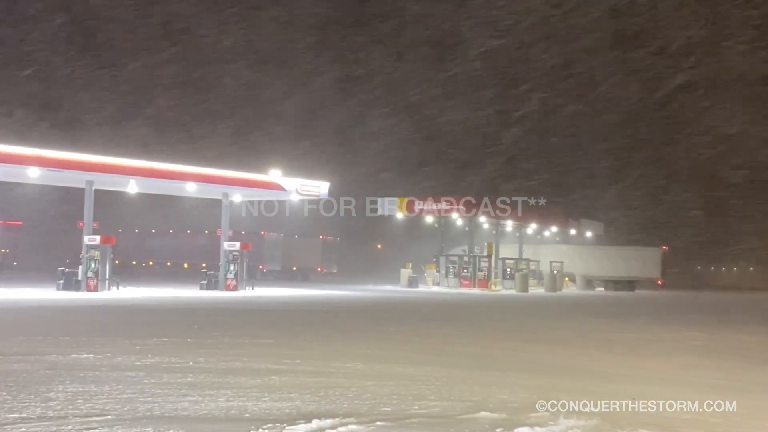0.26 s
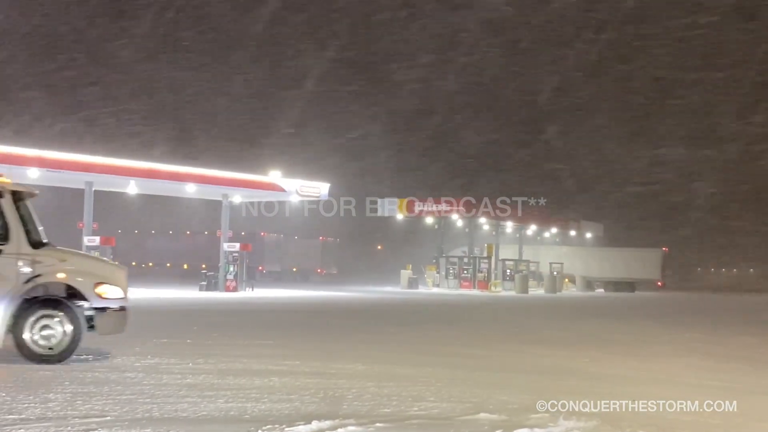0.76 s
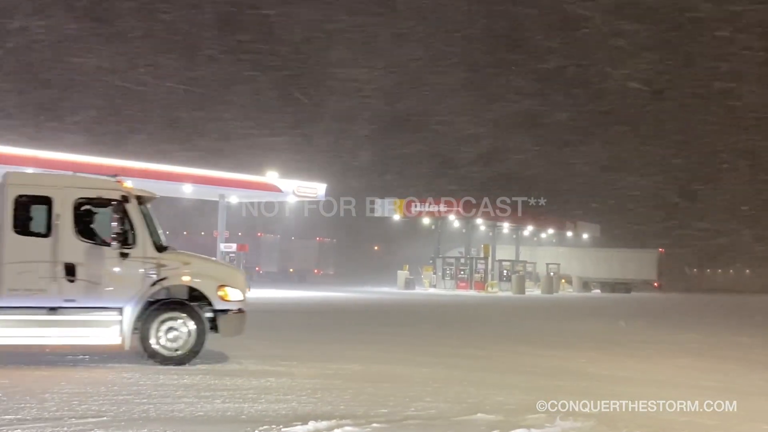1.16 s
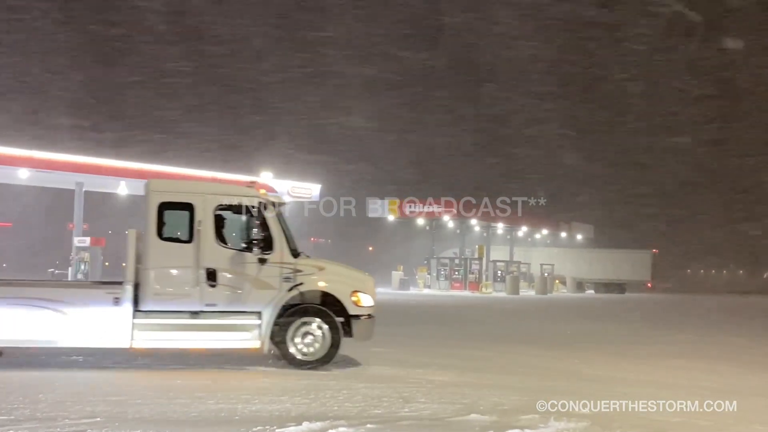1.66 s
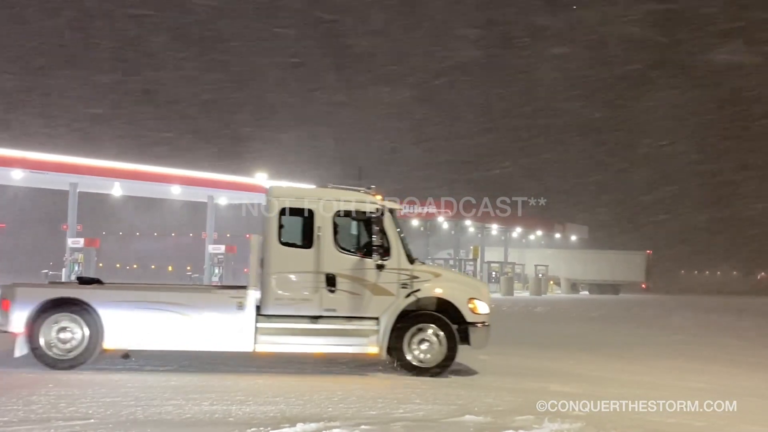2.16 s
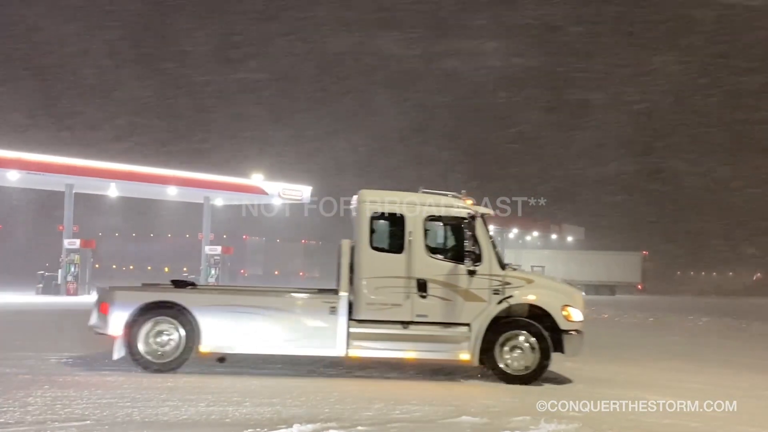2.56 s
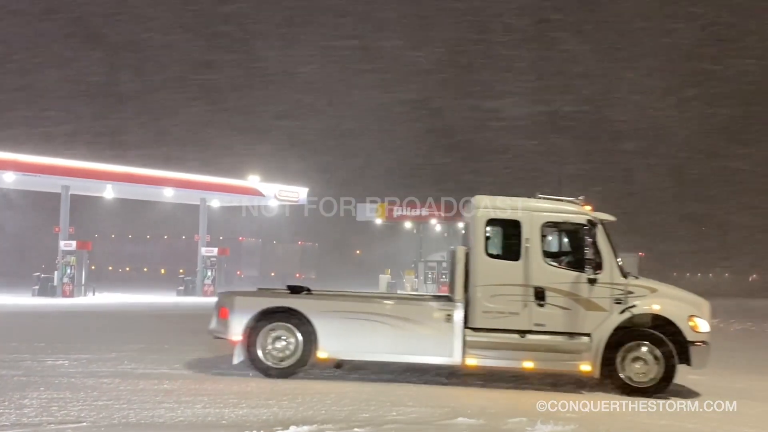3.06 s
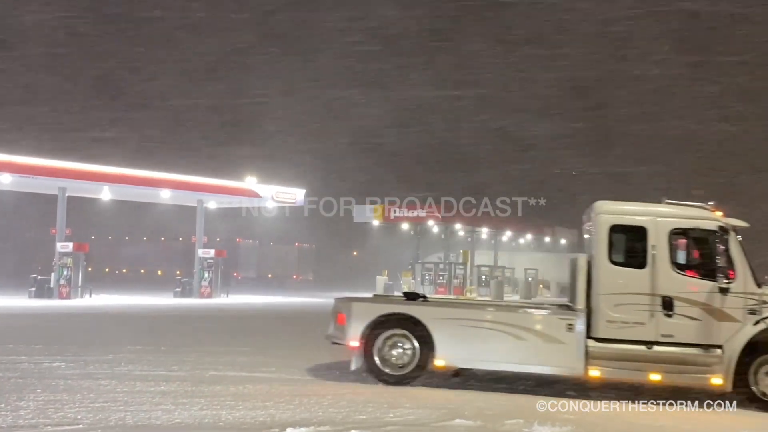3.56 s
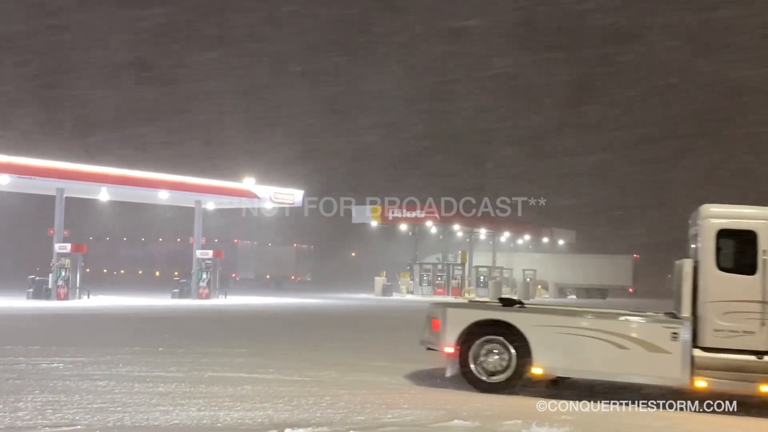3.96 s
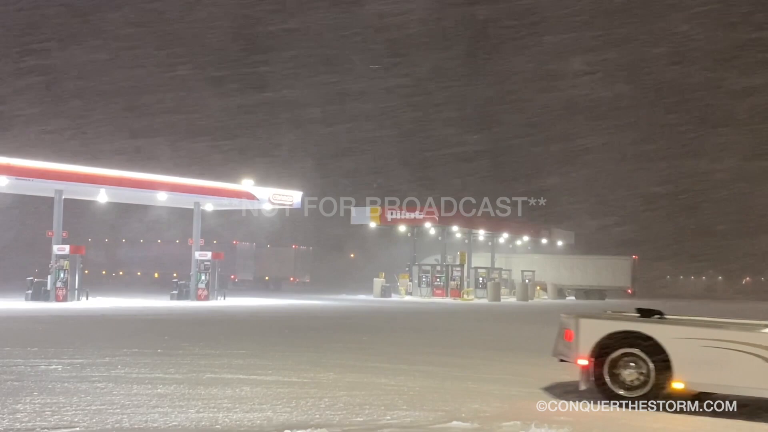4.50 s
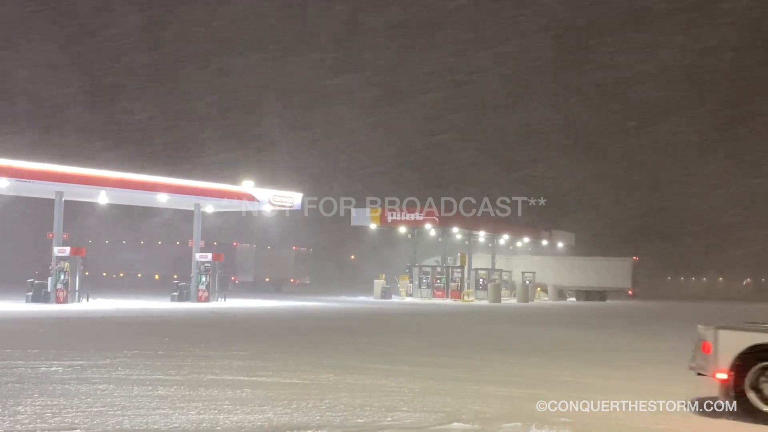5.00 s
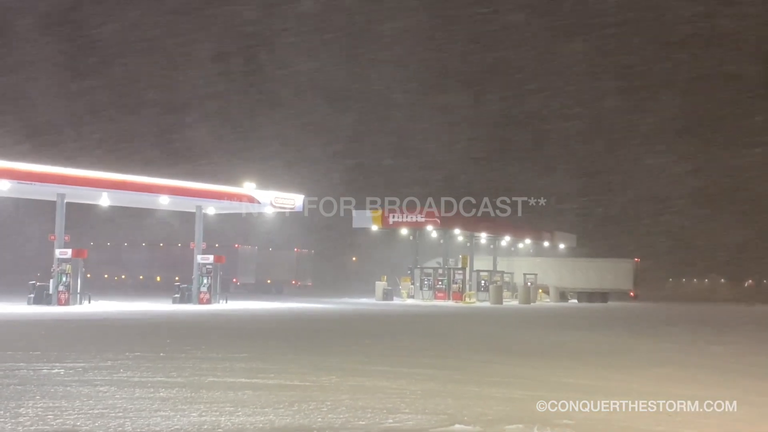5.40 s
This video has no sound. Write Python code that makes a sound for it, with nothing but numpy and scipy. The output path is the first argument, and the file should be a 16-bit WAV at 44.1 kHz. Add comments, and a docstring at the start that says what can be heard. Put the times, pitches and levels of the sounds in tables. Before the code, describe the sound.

A diesel truck eases off and coasts by in a blizzard, its engine rattling and whining under heavy wind buffeting and snow hiss.

```python
"""Gusts rumble, flutter and thump on the microphone while a diesel truck rolls slowly past in a blizzard.
The driver eases off after a second: the engine slows, its rattle softens and the turbo whistle sinks.
A whine accompanies the coasting; tyres, rasps and blowing snow hiss. The midrange leans left, then centres.
Wind is shaped noise with pulses for single eddies; the engine is harmonics and noise gated by its firings.
Turbo and whine are narrow noise bands that follow a pitch; the hisses are coloured, grainy noise."""
import sys
import numpy as np
from scipy import signal
from scipy.fft import rfft, irfft
from scipy.io import wavfile
from scipy.ndimage import uniform_filter1d

SR = 44100
rng = np.random.default_rng(int(sys.argv[2]) if len(sys.argv) > 2 else 0)


def wav_record(signal):
    """Record a signal, one row per channel, as 16-bit PCM in the file named by sys.argv[1]."""
    frames = np.transpose(np.atleast_2d(signal))
    bounded = np.clip(frames, -1, 1)
    # unit amplitude maps onto the largest positive 16-bit level
    quanta = np.round(bounded * 32767).astype(np.int16)
    wavfile.write(sys.argv[1], SR, quanta)


N = 248724
TIME = np.arange(N) / SR
BINS = np.fft.rfftfreq(N, 1 / SR)

# engine speed and turbo whistle: t/s, firing rate/Hz, whistle f/Hz, whistle relative level/dB
ENGINE_CURVE = [(0, 97, 7400, -62), (.6, 111, 7400, -56), (.8, 105, 7260, -62), (1.1, 94, 7130, -56.5),
                (1.45, 79, 6960, -59), (1.9, 73, 6720, -62), (2.3, 76.4, 6420, -69), (3, 78, 5950, -59),
                (3.6, 82, 5850, -51.5), (4.35, 73, 5740, -66), (4.95, 68, 5560, -56), (5.2, 78, 5570, -76),
                (5.64, 82, 5370, -72)]
# when the cab and the tailpipe are nearest (s), and how near (m)
CAB_S, CAB_M = 3.2, 2.93
PIPE_S, PIPE_M = 4.23, 1.5
HIDDEN_DB = -6  # what whine and clatter lose while the truck is broadside on


def amp(db):
    """Decibels to gain."""
    return 10 ** (np.asarray(db) / 20)


def unit(x):
    """Scales to rms 1."""
    return x / np.sqrt(np.mean(np.abs(x) ** 2) + 1e-20)


def follow(rows):
    """The columns of a curve table, sample by sample."""
    s, *columns = np.transpose(rows)
    return [np.interp(TIME, s, c) for c in columns]


def read(points):
    """A table over frequency, joined on a log axis."""
    hz, value = np.transpose(points)
    return np.interp(np.log(BINS + 1), np.log(hz + 1), value)


def bump(centre_s, spread_s):
    """A bell-shaped swell that reaches 1 at its centre."""
    return np.exp(-.5 * ((TIME - centre_s) / spread_s) ** 2)


def rings(modes):
    """Gain over frequency of a set of resonances, summed as power."""
    power = 0
    for hz, width, db in modes:
        power = power + amp(2 * db) / (1 + ((BINS - hz) / width) ** 2 * 2) ** 2
    return np.sqrt(power)


def waver(hz):
    """Slow chance of rms 1, up to about the given rate."""
    lowpass = 1 / (1 + (BINS / hz) ** 4)
    return unit(irfft(rfft(rng.standard_normal(N)) * lowpass, N))


def noise(colour, gate=1, likeness=None):
    """Gated noise of rms 1, coloured and picked up by two ports that hear partly different air."""
    # likeness of the two ports for most sounds: f/Hz, likeness/(0-1)
    usual_likeness = [(60, .95), (200, .88), (700, .88), (1150, .94), (1600, .995), (6000, .995),
                      (8000, .96), (15000, .94)]
    # phase by which the left port leads: f/Hz, phase/rad
    left_lead = [(7400, 0), (9100, -3.1), (11200, -6.3), (13300, -9.4), (15400, -12.6)]
    left, other = rfft(rng.standard_normal((2, N)) * gate)
    same = np.clip(read(usual_likeness if likeness is None else likeness), 0, 1)
    right = same * left + np.sqrt(1 - same ** 2) * other
    right = right * np.exp(-1j * read(left_lead))
    return unit(irfft(np.array([left, right]) * colour, N))


def steadied(x, seconds):
    """Noise with its own slow swells evened out."""
    power = uniform_filter1d((x ** 2).mean(0), int(seconds * SR))
    return x / np.sqrt(power + 1e-9)


def band(x, low_hz, high_hz, order):
    """Causal band-pass: the bass arrives last, so a pulse sinks in pitch."""
    x = signal.sosfilt(signal.butter(order, min(high_hz, SR / 3), fs=SR, output="sos"), x)
    return signal.sosfilt(signal.butter(4, low_hz, "high", fs=SR, output="sos"), x)


def add(mix, s, sound):
    """Mixes a stereo sound in at time s."""
    part = mix[:, max(round(s * SR), 0):][:, :sound.shape[1]]
    part += sound[:, :part.shape[1]]


def whistle(pitch_hz, half_width_hz):
    """A narrow band of noise that follows a pitch curve."""
    turn = 2 * np.pi * np.cumsum(pitch_hz * np.ones(N)) / SR
    return unit(waver(half_width_hz) * np.cos(turn) + waver(half_width_hz) * np.sin(turn))


def load(lift_s=0.914, lift_fall_s=0.027, press_s=5.0, press_rise_s=0.073, press_load=0.4):
    """How hard the engine pulls, 0-1: full at first, then coasting, then a light press of the pedal."""
    lift = np.exp(-np.maximum(TIME - lift_s, 0) / lift_fall_s)
    return lift + press_load * np.clip((TIME - press_s) / press_rise_s, 0, 1)


def passing(nearest_s, nearest_m, speed_m_per_s=4):
    """Gain of a source that rolls by: one over its distance, 1 at the nearest point."""
    return nearest_m / np.hypot(nearest_m, speed_m_per_s * (TIME - nearest_s))


def broadside():
    """1 while the side of the cab faces the microphone, 0 well before and after."""
    return bump(3.2, 0.33)


def drifting(x, depth=0.006):
    """The pitch of every ring wavers a little, by warping time."""
    warped = np.cumsum(1 + depth * waver(hz=5.03)) / SR
    warped = warped * TIME[-1] / warped[-1]
    return np.array([np.interp(warped, TIME, channel) for channel in x])


def wind(lumpy_db=4.5, heave_db=3, rumble_db=-2, flutter_under_db=-12.5):
    """Gusts ride on the breeze: large slow eddies rumble, small ones come in quick lumps and flutter."""
    # wind between gusts: t/s, relative level/dB
    breeze = [(0, -33), (.2, -31), (.3, -29), (.55, -28.5), (1.0, -33), (1.6, -32.5), (2.2, -31.5),
              (2.4, -25), (2.6, -28), (2.9, -28.5), (3.6, -28), (3.82, -34), (3.97, -27.5), (4.13, -30),
              (4.33, -28), (4.6, -27), (4.9, -37), (5.2, -26), (5.45, -33.5), (5.64, -38.5)]
    # gusts that swell and fall: crest t/s, relative rumble level/dB, flutter level/dB, spread/s
    gusts = [(0.076, -19, -29, 0.044), (0.41, -20, -30.5, 0.03), (0.833, -21, -24, 0.029),
             (1.1, -27, -37, 0.013), (1.242, -22.5, -32, 0.019), (1.478, -29, -30, 0.017),
             (1.734, -24.5, -30, 0.033), (1.87, -28, -31.5, 0.061), (2.089, -22, -27, 0.03),
             (2.39, -29, -34, 0.03), (2.53, -32, -32.5, 0.043), (2.714, -41, -32, 0.033),
             (3.294, -22, -29, 0.033), (3.45, -25, -30, 0.035), (3.628, -25.5, -27.5, 0.0063),
             (4.219, -29, -34.5, 0.033), (4.443, -23, -23, 0.014), (4.725, -24, -30, 0.087),
             (4.954, -25.5, -27.5, 0.045), (5.093, -18, -18, 0.02), (5.279, -21, -25, 0.021),
             (5.351, -23, -32, 0.021)]
    # spectrum of the large eddies: f/Hz, relative level/dB
    rumble_colour = [(20, -49), (32, -20), (50, 3), (80, 0.5), (130, -2.5), (200, -13), (400, -26.5),
                     (900, -61)]
    # spectrum of the small eddies: f/Hz, relative level/dB
    flutter_colour = [(40, -27), (110, -12), (200, 0.5), (350, -3), (600, -13), (1000, -27.5),
                      (2000, -34.5), (4000, -52.5)]
    breeze_db = follow(breeze)[0]
    low_power = amp(2 * breeze_db)
    mid_power = amp(2 * (breeze_db + flutter_under_db))
    for s, low_db, mid_db, spread in gusts:
        swell = bump(s, spread)
        low_power = low_power + amp(2 * low_db) * swell
        mid_power = mid_power + amp(2 * mid_db) * swell
    rumble = steadied(noise(amp(read(rumble_colour)), amp(heave_db * waver(hz=24.9))), 0.081)
    flutter = steadied(noise(amp(read(flutter_colour)), amp(lumpy_db * waver(hz=53.5))), 0.164)
    return amp(rumble_db) * np.sqrt(low_power) * rumble + np.sqrt(mid_power) * flutter


def truck(ring_share=0.8, overtone_db=-18, jitter=0.0077, unsteady_db=4.0, sway_cycles=0.11):
    """Each firing puffs down the exhaust and knocks the block and the panels round it."""
    # unequal knocks of the six cylinders, in firing order: level/dB
    cylinders_db = [2, -9, -4, 1.5, -9, -4]
    # broad spectrum of the roar: f/Hz, relative level/dB
    roar_colour = [(260, -33), (450, -36), (541, 4), (631, -7), (804, 1.5), (884, -4.5), (1370, 2),
                   (1500, -6), (1640, -0.5), (2100, -10.5), (2280, -3.5), (2600, -17), (3380, -46),
                   (5720, -120)]
    # resonances in the roar: f/Hz, width/Hz, relative level/dB
    roar_rings = [(735, 25, -7), (820, 46, -1.5), (1030, 205, 3), (1337, 15.6, 8.5), (1420, 31, -3)]
    # spectrum of the rattle: f/Hz, relative level/dB
    rattle_colour = [(700, -11), (1200, 1.5), (1700, -9.5), (2150, 9.5), (2500, 6), (2830, 8), (3200, -5.5),
                     (3600, -6), (4000, -2), (4600, -1.5), (6500, -15), (9000, -19)]
    # resonances of the engine block: f/Hz, width/Hz, relative level/dB
    block_rings = [(1336, 37, -1), (1800, 83, -0.5), (1982, 55, 7), (2215, 71, 4), (2700, 50, -3),
                   (3350, 97, -0.5), (3628, 42, 3.5), (3990, 79, -11), (4450, 100, -12), (4740, 59, -7),
                   (5450, 120, -9.5), (7500, 690, -14.5)]
    firing_hz, pull = follow(ENGINE_CURVE)[0], load()
    firings = np.cumsum(firing_hz * (1 + jitter * waver(hz=9.1))) / SR
    # unequal knocks make the noise throb once a crank turn
    strength = amp(cylinders_db)[firings.astype(int) % len(cylinders_db)]
    knocks = 0.5 + strength * np.exp(-(firings % 1) / 0.4)  # fades over 0.4 of a firing, above a floor

    swayed = firings + sway_cycles * waver(hz=23.0)  # gusts push the exhaust puffs about
    exhaust = unit(sum(amp(overtone_db * k) * np.sin(2 * np.pi * (k + 1) * swayed) for k in range(4)))
    roar_spectrum = unit(amp(read(roar_colour))) + ring_share * unit(rings(roar_rings))
    roar = noise(roar_spectrum, knocks + 1.7)  # fan and tyres add the steady share
    rattle = noise(amp(read(rattle_colour)), knocks)
    clatter = drifting(noise(rings(block_rings), knocks))

    # the bonnet screens the roar until the side of the cab comes round
    screened = .5 * (1 - np.tanh((TIME - 2.02) / (2 * 0.034)))
    # each level: pedal up, plus what full load adds
    exhaust_db = -28.5 - 1 * pull + unsteady_db * waver(hz=20)
    roar_db = -35 + 9 * pull - 12.5 * screened
    rattle_db = -57 + 16 * pull
    clatter_db = -46 - 7.5 * pull + HIDDEN_DB * broadside()
    return (exhaust * passing(PIPE_S, PIPE_M) * amp(exhaust_db)
            + roar * passing(CAB_S, CAB_M) * amp(roar_db)
            + rattle * amp(rattle_db)
            + clatter * amp(clatter_db))


def turbo(waver_db=3.0, half_width_hz=90, near_half_width_hz=260):
    """A breathy, broken whistle that sinks as the turbine runs down and spreads into a hiss close by."""
    _, whistle_hz, db = follow(ENGINE_CURVE)
    near = passing(CAB_S, CAB_M) ** 2
    narrow = np.sqrt(1 - near) * whistle(whistle_hz, half_width_hz)
    wide = np.sqrt(near) * whistle(whistle_hz, near_half_width_hz)
    return amp(db + waver_db * waver(hz=22)) * (narrow + wide)


def tyres(level_db=-50.5, grain_db=2):
    """Tyres press dry snow: a broad, grainy hiss, strongest while the truck is close."""
    # spectrum of the pressed snow: f/Hz, relative level/dB
    tyre_colour = [(1800, -2), (2600, -20), (3100, -25), (3500, 9), (4400, 9), (4700, 15), (5000, -10),
                   (5300, -6), (6500, 1), (8000, -5.5)]
    hiss = noise(amp(read(tyre_colour)), amp(grain_db * waver(hz=300)))
    return amp(level_db) * passing(CAB_S, CAB_M) ** 2 * hiss


def snow(level_db=8.0, swirl_db=1.13, grain_db=2.0):
    """Countless ice grains skim the ground in drifting sheets: noise with fast grain and slow swirl."""
    # level of the snow hiss: t/s, relative level/dB
    hiss_level = [(0, -46), (.35, -46.5), (1.2, -50), (1.65, -50), (2.1, -51.5), (2.6, -50), (3.6, -50),
                  (4.25, -52), (5.0, -52), (5.3, -56.5), (5.64, -48.5)]
    # spectrum of the grains: f/Hz, relative level/dB
    snow_colour = [(150, -43), (390, -8), (560, 13), (900, 14.5), (1150, 5), (1450, 11), (2100, 7),
                   (3100, 6), (4500, 5.5), (6200, -0.5), (7500, -7.5), (11200, -6.5), (15500, -12)]
    # snow comes from all round, so its midrange differs more between ports: f/Hz, likeness/(0-1)
    snow_likeness = [(400, .8), (900, .55), (1400, .15), (1750, .8), (2100, .995), (6000, .995),
                     (8000, .93), (15000, .9)]
    grains = amp(grain_db * waver(hz=1520) + swirl_db * waver(hz=23.2))
    return amp(follow(hiss_level)[0] + level_db) * noise(amp(read(snow_colour)), grains, snow_likeness)


def buffets(low_share=0.17, lowest_hz=55, boom_hz=150, boom_db=-2, apart_least=0.21, apart_hz=1700,
            level_db=-4.0):
    """A gust tears off the casing in a burst of turbulence that swells fast and dies away over a low boom."""
    # hardest bursts: crest t/s, relative crest level/dB, upper corner f/Hz, swell time/s
    bursts = [(0.027, -17.5, 534, .013), (0.067, -13, 690, 0.0084), (0.38, -18.5, 656, 0.011),
              (.43, -18, 640, 0.0072), (0.785, -11, 586, .012), (.815, -20.5, 680, 0.009),
              (0.854, -17, 527, 0.0077), (1.237, -17.5, 560, 0.0044), (1.389, -24, 295, 0.0089),
              (1.71, -24, 562, 0.015), (1.779, -27, 555, .016), (1.87, -24, 479.3, 0.015),
              (2.145, -19, 540, 0.009), (2.346, -19, 890, 0.0058), (2.39, -24, 670, 0.0083),
              (2.665, -25, 496, 0.0096), (2.749, -26, 510, .01), (3.185, -18.5, 544, 0.0072),
              (3.26, -16, 560, 0.0058), (3.294, -16.5, 420, 0.0033), (4.41, -22, 560, 0.0062),
              (4.444, -18, 540, 0.0037), (4.631, -16, 900, 0.003), (4.679, -16.5, 537, 0.00766),
              (4.711, -24, 770, 0.0049), (4.767, -16.5, 736, 0.0069), (4.845, -23, 616, 0.009),
              (4.966, -29, 700, 0.013), (5.058, -22, 910, 0.0084), (5.085, -23, 900, 0.0085),
              (5.107, -15.5, 700, 0.0053), (5.26, -16.5, 890, 0.01), (5.277, -10, 680, 0.0041),
              (5.286, -13, 890, 0.0066), (5.301, -15.5, 706, 0.0048)]
    out, t = np.zeros((2, N)), np.arange(SR // 8) / SR
    for s, db, hz, swell in bursts:
        shared, side = rng.standard_normal((2, len(t)))
        shape = (t / swell) ** 2 * np.exp(2 - 2 * t / swell)
        apart = apart_least + (hz / apart_hz) ** 2  # small eddies reach each port separately
        swirl = (shared + apart * np.array([side, -side])) * shape
        burst = unit(band(swirl, max(low_share * hz, lowest_hz), hz, order=4))
        boom = unit(band(swirl, lowest_hz, boom_hz, order=4))
        gain = amp(db + level_db) * np.sqrt(np.mean(shape ** 2))
        add(out, s - swell, gain * (burst + amp(boom_db) * boom))
    return out


def thumps(reach=1.016, low_share=0.42, level_db=-1.0, wake_share=0.36, wake_sink=0.69, wake_cycles=1.31):
    """One eddy crosses the port: a push and a suck of pressure, then a slower, weaker one in its wake."""
    # single eddies: t/s, relative peak level/dB, centre f/Hz, left-right level/dB
    eddies = [(0.046, -14, 333, -1), (0.067, -12.5, 456, 2), (0.099, -14, 566, 1), (.13, -22, 376, 6),
              (.274, -27.5, 446, 3), (.419, -15, 525, 4), (0.775, -15.5, 420, 2), (.7845, -15.5, 607, 7),
              (.841, -12.5, 584, 6), (.857, -15, 385, -2), (1.23, -16, 435, 5), (1.236, -17.5, 567, 3),
              (1.925, -16, 290, 3), (2.085, -21, 252, -1), (2.137, -12.5, 400, 3.5), (2.339, -15, 607, -1),
              (2.383, -17, 506, 1), (2.758, -24, 400, 2), (3.286, -9, 400.5, 3.5), (3.313, -13, 560, 3),
              (4.177, -9.5, 353, 3.5), (4.427, -4.5, 334, 4.5), (4.627, -5.5, 421, 1),
              (4.672, -14.5, 705, 4), (4.712, -19, 551, 2), (4.768, -14, 563, -2), (4.8, -19, 450, 7),
              (4.897, -25, 522, 14), (4.973, -18, 570, -1), (5.011, -22, 480, -2), (5.048, -12.5, 553, 5),
              (5.061, -12, 564, 4), (5.085, -16, 520, 5), (5.1, -8.5, 910, 6.5), (5.18, -19, 600, 3),
              (5.221, -22, 450, 5), (5.2705, -5.5, 1260, 2.5), (5.2725, -7.5, 670, 3)]
    out, t = np.zeros((2, N)), np.arange(SR // 12) / SR
    for s, db, hz, pan_db in eddies:
        gains = amp([[db + level_db + pan_db / 2], [db + level_db - pan_db / 2]])
        strike = (0, 1, hz)
        wake = (wake_cycles / hz, wake_share, wake_sink * hz)
        for delay, share, pitch in (strike, wake):
            u = 2 * np.pi * pitch * t
            pulse = band((1 - u) * np.exp(-u), low_share * pitch, reach * pitch, order=3)
            add(out, s + delay, share * gains * pulse / abs(pulse).max())
    return out


def booms(sink=0.54, skew=0.55, apart_rad=0.19):
    """A large vortex rocks the air in the ports: a few deep swings that swell and sink in pitch."""
    # deep booms around the harder thumps: t/s, peak level/dB, starting f/Hz, length/s
    vortices = [(0.766, -8, 148.3, 0.057), (1.232, -33, 178, 0.039), (2.132, -20, 172, 0.04),
                (3.28, -12, 235, 0.017), (4.173, -14, 135, 0.034), (4.436, -16, 127.1, 0.021),
                (4.629, -14, 110, 0.025), (5.108, -5.5, 153, 0.019), (5.291, -8.5, 170, 0.014),
                (5.323, -13.5, 115, 0.018), (5.358, -10.5, 129, 0.03)]
    out = np.zeros((2, N))
    for s, db, hz, length in vortices:
        u = np.arange(0, length, 1 / SR) / length
        turn = 2 * np.pi * np.cumsum(hz * (1 - sink * u)) / SR
        swings = np.sin(turn + np.array([[apart_rad], [-apart_rad]]))
        add(out, s, amp(db) * np.sin(np.pi * u ** skew) * swings)
    return out


def whine(pitch_hz=3925, base_db=-52, behind_db=2, on_s=0.77, off_s=5.08, fade_s=0.044, throb=0.38,
          waver_db=2.5):
    """A hoarse whine while coasting, partly hidden broadside on; it throbs once a crank turn."""
    crank = np.cumsum(follow(ENGINE_CURVE)[0]) / SR / 3  # three firings a turn
    coasting = np.clip(np.minimum(TIME - on_s, off_s - TIME) / fade_s, 0, 1)
    level_db = base_db + behind_db * passing(PIPE_S, PIPE_M) + HIDDEN_DB * broadside()
    level = coasting * amp(level_db + waver_db * waver(hz=30))
    return level * (1 + throb * np.cos(2 * np.pi * crank)) * whistle(pitch_hz, half_width_hz=117)


def rasps(ring_share=1.0, grain_db=2):
    """A quick run of grainy hisses: noise with a hollow ring, swelling and fading."""
    # short hisses: crest t/s, relative level/dB, spread/s
    hisses = [(1.461, -37.5, 0.016), (1.55, -42, 0.01), (1.617, -36, 0.021), (1.661, -39, 0.0071),
              (1.722, -38, 0.014), (1.77, -35, 0.016), (1.842, -38, 0.023), (1.878, -38, 0.0084),
              (1.969, -37, 0.012), (1.997, -39, 0.0059)]
    # broad spectrum of a rasp: f/Hz, relative level/dB
    rasp_colour = [(1200, -32), (2000, 2), (2600, -38), (3500, 12), (5200, -1.5), (7000, -37),
                   (11000, -1.5), (15500, -6)]
    # resonances of a rasp: f/Hz, width/Hz, relative level/dB
    rasp_rings = [(1930, 36, 6), (2155, 55, 12), (2820, 67, 5), (3330, 83, 12), (3680, 100, -3),
                  (4560, 140, 3), (5370, 180, 1), (6750, 1300, -3.5)]
    level = sum(amp(db) * bump(s, spread) for s, db, spread in hisses)
    colour = unit(amp(read(rasp_colour))) + ring_share * unit(rings(rasp_rings))
    return level * noise(colour, amp(grain_db * waver(hz=250)))


def scattered(x, patchy_db=1.51):
    """Shifting paths through the gusty air make narrow bands fade in and out."""
    z = signal.stft(x, nperseg=1024, noverlap=768)[2]
    patches = rng.standard_normal(z.shape[1:])
    patches = uniform_filter1d(patches, size=4, axis=0)  # across frequency
    patches = uniform_filter1d(patches, size=24, axis=1)  # along time
    return signal.istft(z * amp(patchy_db * unit(patches)), nperseg=1024, noverlap=768)[1][:, :N]


def placed(x, centre_hz=1000, octaves=0.6):
    """Leans and widens the midrange by mid and side gains; bass and treble are left as they are."""
    # stereo image of the midrange: t/s, left-right level/dB, extra side level/dB
    image = [(0, 1.5, 7), (.85, 10, 6.5), (1.0, 4.5, 1.5), (2.1, 4, 3.5), (3.3, 2, -7.5), (3.76, 0.5, -2),
             (3.82, 1, 16), (3.88, 0.5, 1), (4.95, 0, 9), (5.15, 2, 9), (5.64, -1, 8)]
    lean_db, wide_db = follow(image)
    window = 1 / (1 + (np.log2((BINS + 1) / centre_hz) / octaves) ** 6)
    part = irfft(rfft(x) * window, N)
    mid = part.mean(0)
    side = (part[0] - part[1]) / 2 * amp(wide_db)
    return x - part + np.array([(mid + side) * amp(lean_db / 2), (mid - side) * amp(-lean_db / 2)])


def scene():
    """Wind at the microphone, the truck a few metres off, snow all round."""
    outdoors = truck() + turbo() + tyres() + snow() + whine() + rasps()
    at_microphone = wind() + buffets() + thumps() + booms()
    return at_microphone + placed(scattered(outdoors))


def record(dry):
    """The recorder's band limit: a steep low-pass at 15.8 kHz."""
    lowpass = signal.firwin(511, 15800, window=("kaiser", 9), fs=SR)
    return signal.oaconvolve(dry, lowpass[None], "same", axes=1)


dry = scene()
out = record(dry)
wav_record(out)
```